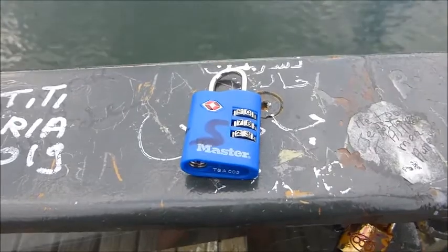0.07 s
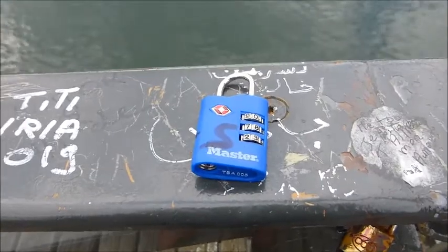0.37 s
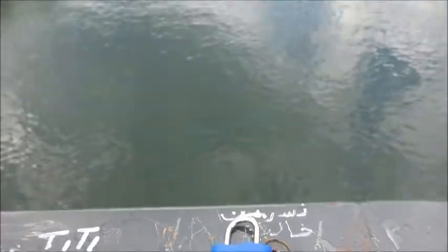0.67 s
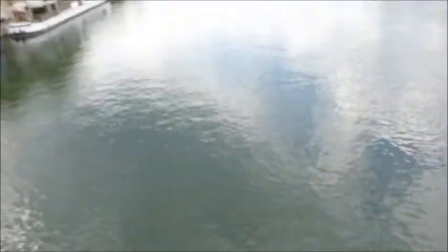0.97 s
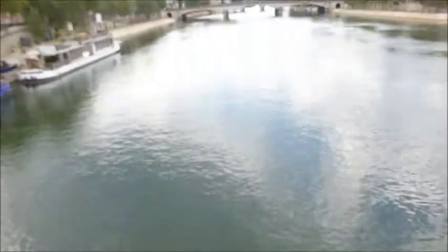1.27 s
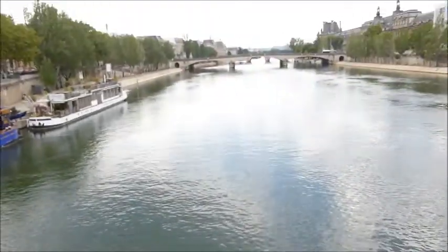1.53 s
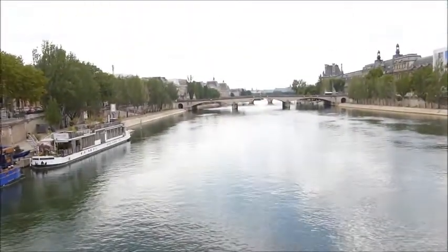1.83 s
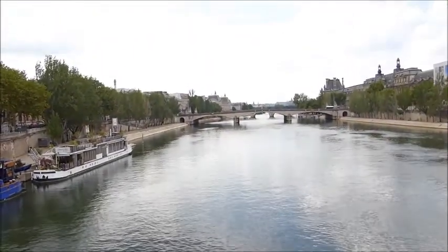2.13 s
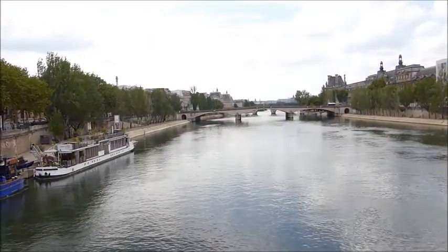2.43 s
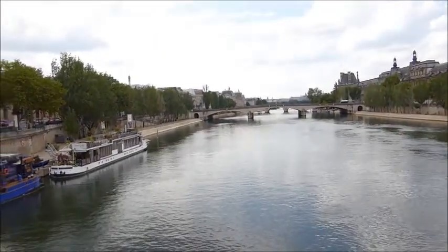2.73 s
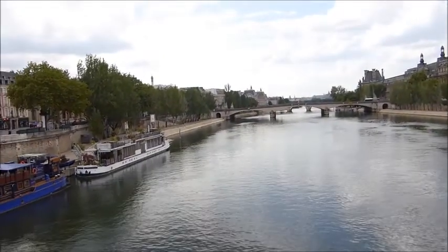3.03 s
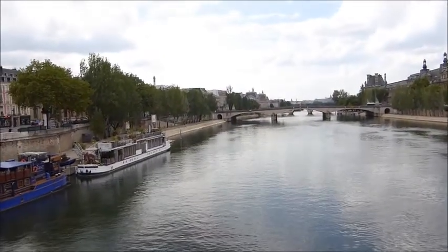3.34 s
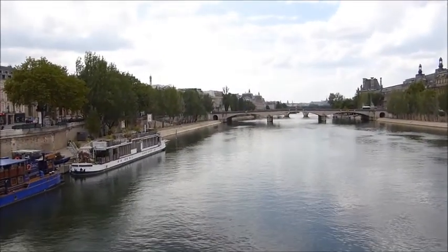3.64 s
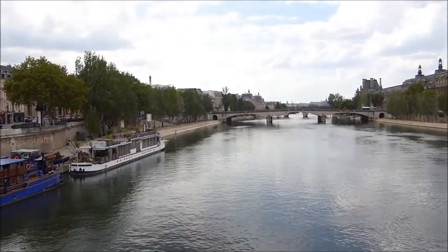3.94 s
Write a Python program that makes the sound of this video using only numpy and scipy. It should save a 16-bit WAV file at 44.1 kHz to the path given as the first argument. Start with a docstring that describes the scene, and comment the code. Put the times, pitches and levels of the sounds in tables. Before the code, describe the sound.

Far-off engines and tyres blend into a steady wash outdoors above a river. Gusts thump against the microphone at first and die down, while a tiny camera motor whirs very faintly. Everything gradually grows quieter.

```python
"""City traffic heard from a bridge over a river: engine rumble, tyre roar and a hiss that recedes.
Each is a wash of noise with its own tone and a slight flicker. Mostly in the first second, wind
buffets the two microphone ports (openings) with low rumbles and thuds. A tiny motor in the camera
whirs faintly in pulses. The whole sound fades from halfway on and then stops."""
import sys
import numpy as np
from scipy import signal
from scipy.fft import rfft, irfft
from scipy.io import wavfile

SR = 44100
rng = np.random.default_rng(int(sys.argv[2]) if len(sys.argv) > 2 else 0)


def dump(signal):
    """Clip the signal to [-1, 1] and save it as 16-bit WAV at the path in sys.argv[1]."""
    limited = np.clip(np.atleast_2d(signal).T, -1, 1)
    pcm = np.round(limited * 32767).astype(np.int16)
    wavfile.write(sys.argv[1], SR, pcm)


N = 176400
TIME = np.arange(N) / SR
FREQS = np.maximum(np.arange(N // 2 + 1) * SR / N, 1)


def from_db(db):
    """Turn decibels into a number to multiply by."""
    return 10 ** (np.asarray(db) / 20)


def rms_one(x):
    """Scale a signal so that its average power is 1."""
    return x / np.sqrt(np.mean(x ** 2) + 1e-20)


def gain_over_time(rows):
    """Join rows of seconds and dB into one gain curve for each dB column."""
    seconds, *columns = np.transpose(rows)
    return from_db([np.interp(TIME, seconds, db) for db in columns])


def db_over_hz(rows):
    """Join rows of Hz and dB into a dB value for every frequency."""
    hz, db = np.transpose(rows)
    return np.interp(np.log(FREQS), np.log(hz), db)


def colour(tone):
    """Gain at every frequency, falling away beyond the ends of the table."""
    skirts = np.minimum(FREQS / tone[0][0], 1) * np.minimum(tone[-1][0] / FREQS, 1)
    return from_db(db_over_hz(tone)) * skirts ** 2


def white():
    """The spectrum of fresh white noise."""
    return rfft(rng.standard_normal(N))


def drift(rate_hz):
    """A slow random wobble, about 1 in size."""
    return rms_one(irfft(white() / (1 + (FREQS / rate_hz) ** 2), N))


def narrow_tones(rows, width_hz):
    """Wavering tones: noise kept only close to each pitch."""
    tones = 0
    for hz, db in rows:
        spectrum = white() / (1 + ((FREQS - hz) / width_hz) ** 2)
        tones = tones + from_db(db) * rms_one(irfft(spectrum, N))
    return tones


def pulses(first_s, period_s, sharpness):
    """Regular swells of height 1."""
    return np.exp(sharpness * (np.cos(2 * np.pi * (TIME - first_s) / period_s) - 1))


# The tones in the motor's four sounds. Each row: pitch in Hz, level in dB before pulsing and boost.
WHINE_TONES = [(4338, -85.5), (4571, -87.5)]
WHIRR_TONES = [(4767, -79.5), (4990, -79.5), (5135, -76.5), (5330, -79.5)]
TICK_TONES = [(9841, -83.5), (10019, -85.5)]
SIZZLE_TONES = [(12520, -91.5), (12810, -87), (13040, -90)]
# How those sounds grow and shrink, in pairs. Each row: time in seconds, boost in dB.
WHIRR_WHINE_BOOST = [(0, 5), (.7, 8.5), (1.3, 5), (2.2, 0), (3.0, 0), (3.8, 0)]
TICK_SIZZLE_BOOST = [(0, 4), (.7, 5.5), (1.3, 0.5), (2.2, -2), (3.0, 5), (3.8, 4)]

def camera_motor():
    """A tiny motor whines steadily, whirrs and ticks by turns eight times a second, and sizzles twice as fast."""
    period_s, width_hz = 0.1244, 41
    whirr = pulses(0.008, period_s, sharpness=2.5) * narrow_tones(WHIRR_TONES, width_hz)
    tick = pulses(0.065, period_s, sharpness=2.6) * narrow_tones(TICK_TONES, width_hz)
    sizzle = pulses(0.005, period_s / 2, sharpness=1.4) * narrow_tones(SIZZLE_TONES, width_hz)
    whine = narrow_tones(WHINE_TONES, width_hz=3.6)
    lower = gain_over_time(WHIRR_WHINE_BOOST) * (whirr + whine)
    upper = gain_over_time(TICK_SIZZLE_BOOST) * (tick + sizzle)
    return lower + upper


# The wind's deep tone. Each row: frequency in Hz, relative strength in dB.
WIND_TONE = [(25, -28), (50, -41.5), (85, -4), (130, 3), (190, 4), (290, -6), (400, -15), (700, -16.5),
             (2000, -48.5)]
# The gusts. Each row: time in seconds, left level in dB, right level in dB.
GUST_LEVELS = [(0, -69, -56), (.14, -56, -52), (.24, -44, -44), (.29, -38.5, -45), (.38, -48.5, -40.5),
               (.42, -57.5, -54), (.55, -43, -42), (.70, -46.5, -44), (.77, -41.5, -50), (.86, -36, -48.5),
               (.96, -59, -70.5), (1.25, -54.5, -64.5), (1.42, -57.5, -63), (1.66, -47.5, -54),
               (1.8, -64, -96.5), (2.35, -81, -57), (2.7, -91, -83)]

def wind():
    """Churning air makes a low, lumpy rumble, different at each microphone port."""
    lump_db, ports = 1.5, []
    for _ in range(2):
        rumble = irfft(white() * colour(WIND_TONE), N)
        lumps = from_db(lump_db * np.clip(drift(rate_hz=20), -2, 2))
        ports.append(rms_one(rumble * lumps))
    return gain_over_time(GUST_LEVELS) * np.array(ports)


# Eddies, small swirls of air that hit the ports.
# Each row: time in seconds, left peak in dB, right peak in dB, pitch in Hz.
EDDIES = [(.116, -35, -26.5, 170), (0.174, -42, -23.5, 180), (.208, -24.5, -31.5, 180),
          (.282, -35, -25.5, 280), (.289, -28, -24, 230), (0.317, -38, -30, 300),
          (0.327, -20.5, -33.5, 208), (0.347, -43, -21.5, 210), (0.3711, -27.5, -12.5, 235),
          (.380, -36.5, -20, 380), (0.502, -22, -29.5, 215), (0.531, -46.5, -24.5, 194),
          (0.564, -19.5, -20, 202), (0.614, -23, -41.5, 192), (.752, -30.5, -40, 197),
          (.763, -33, -31.5, 168), (.780, -29, -39, 210), (0.845, -25.5, -31, 280),
          (0.868, -28.5, -39, 241)]

def wind_buffets():
    """Each eddy sucks briefly at the ports; each port rounds that off and swings at the eddy's pitch."""
    suction_width_s, crossing_s = 0.00044, 0.00077
    low_cut_hz, top_over_pitch, pitch_spread = 126, 1.76, 0.04
    out, span = np.zeros((2, N)), int(0.06 * SR)
    t = np.arange(span) / SR - 0.01
    suction = -np.exp(-0.5 * (t / suction_width_s) ** 2)
    for time_s, left_db, right_db, hz in EDDIES:
        passband = signal.butter(3, [low_cut_hz, top_over_pitch * hz], "band", fs=SR, output="sos")
        rounded = signal.sosfilt(passband, suction)
        for port, db in enumerate((left_db, right_db)):
            ring_hz = hz * np.exp(pitch_spread * rng.standard_normal())
            thud = signal.lfilter(*signal.iirpeak(ring_hz, Q=1.62, fs=SR), rounded)
            arrival_s = time_s + crossing_s * (0.5 - port)   # the left port is reached later
            loudest_sample = abs(signal.hilbert(thud)).argmax()
            start = int(arrival_s * SR) - loudest_sample
            out[port, start:start + span] += from_db(db) * thud / abs(thud).max()
    return out


# How wide distant sound is. Each row: frequency in Hz, dB of the side noise over the shared noise.
STEREO_WIDTH = [(60, -5.5), (160, -33), (270, -45), (480, -24), (740, -16), (1220, -8.5), (2000, -7.5),
                (3300, -8), (6000, -4.5), (15000, -5.3)]
# Which way it leans. Each row: frequency in Hz, left level minus right level in dB.
STEREO_LEAN = [(200, -0.5), (700, 0.5), (1290, -3), (2380, -4), (4400, -2.5), (8100, 0.1)]

def far_noise(tone, levels, flicker_db=0.76):
    """Distant stereo noise, wider in the treble; its octaves flicker partly together, partly alone."""
    sides = np.array([[1], [-1]])   # side noise is added on the left and taken away on the right
    ports = white() + sides * from_db(db_over_hz(STEREO_WIDTH)) * white()
    ports = ports * colour(tone) * from_db(sides * db_over_hz(STEREO_LEAN) / 2)
    octave = np.clip(np.log2(FREQS / 60), 0, 8)   # counted up from 60 Hz
    noise, together = 0, drift(rate_hz=4)
    for k in range(9):
        band = irfft(ports * np.maximum(1 - abs(octave - k), 0), N)
        flicker = 0.59 * together + 0.71 * drift(rate_hz=12)
        noise = noise + band * from_db(flicker_db * flicker)
    return gain_over_time(levels) * rms_one(noise)


# The background's tone. Each row: frequency in Hz, relative strength in dB.
BACKGROUND_TONE = [(2000, -4.5), (5000, 5.5), (8600, 1.5), (9700, 2), (11500, -1.5), (15000, -8.5)]
# How loud it is. Each row: time in seconds, level in dB before the fade.
BACKGROUND_LEVELS = [(0, -86), (1.0, -71), (1.76, -71.5), (1.81, -67.5), (1.86, -70), (2.3, -76.5),
                     (2.7, -70.5), (3.1, -73), (3.8, -74.5)]

def background_hiss():
    """A thin, faint hiss lies behind the traffic."""
    return far_noise(BACKGROUND_TONE, BACKGROUND_LEVELS)


# The tone of each part of the traffic. Each row: frequency in Hz, relative strength in dB.
ENGINE_TONE = [(30, -37), (55, -35.5), (100, -16), (160, -6.5), (235, 0), (295, -1.04), (350, -6.5),
               (480, -13.5), (900, -34.5)]
TYRE_TONE = [(200, -34), (440, -10.5), (600, -2.5), (740, 0), (890, -6), (1080, -3.5), (1350, -15),
             (2000, -24), (4000, -32.5), (9000, -56.5)]
CAR_HISS_TONE = [(300, -1), (700, -3), (1080, 2.5), (1400, -4), (2000, -9.5), (2900, -16.5), (3500, -18.5),
                 (3850, -23.5), (4500, -20), (5800, -31), (8500, -35), (15000, -43.5)]
# How loud each part is. Each row: time in seconds, level in dB before the fade.
ENGINE_LEVELS = [(0, -40.5), (.7, -47), (1.0, -45.5), (1.2, -44.5), (1.4, -47), (1.6, -44.5), (2.2, -48),
                 (3.8, -47)]
TYRE_LEVELS = [(0, -43), (.9, -46.5), (1.7, -43), (2.1, -45), (2.4, -44), (3.1, -45), (3.8, -43.3)]
CAR_HISS_LEVELS = [(0, -42.5), (.7, -44), (1.3, -46), (2.1, -52), (3.04, -50), (3.15, -48), (3.3, -49),
                   (3.8, -50.5)]

def traffic():
    """Far-off engines rumble and tyres roar, while the hiss of nearer cars recedes."""
    engines = far_noise(ENGINE_TONE, ENGINE_LEVELS, flicker_db=0.9)
    tyres = far_noise(TYRE_TONE, TYRE_LEVELS)
    car_hiss = far_noise(CAR_HISS_TONE, CAR_HISS_LEVELS)
    return engines + tyres + car_hiss


def scene():
    """Traffic and a thin hiss far off, wind and motor right at the microphone."""
    return traffic() + background_hiss() + wind() + wind_buffets() + camera_motor()


def record(dry):
    """A narrow treble band near 9 kHz is dulled; the sound fades, stops and loses its very top."""
    dip_hz, dip_depth, cutoff_hz = 9070, 0.89, 15300
    fade_start_s, fade_db_per_s = 2.16, 7
    stop_s, stop_db_per_s = 3.82, 2200
    dipped = dry - dip_depth * signal.lfilter(*signal.iirpeak(dip_hz, Q=18, fs=SR), dry)
    fade_db = fade_db_per_s * np.maximum(TIME - fade_start_s, 0)
    stop_db = stop_db_per_s * np.maximum(TIME - stop_s, 0)
    top_cut = signal.ellip(12, 0.1, 80, cutoff_hz, fs=SR, output="sos")
    return signal.sosfilt(top_cut, dipped * from_db(-fade_db - stop_db))


dry = scene()
out = record(dry)
dump(out)
```